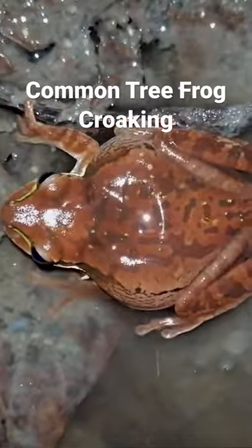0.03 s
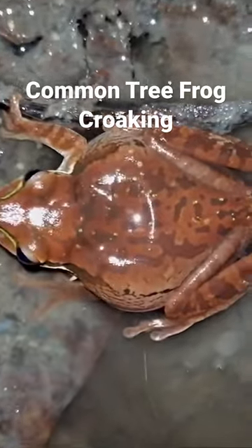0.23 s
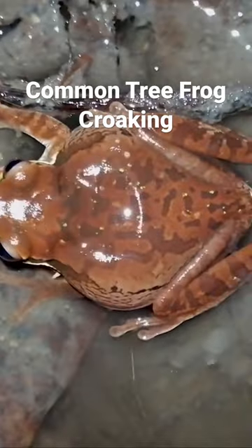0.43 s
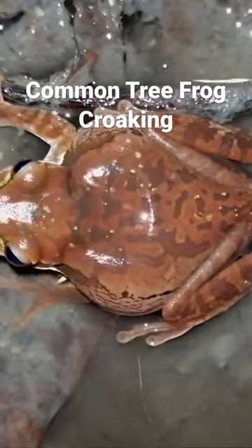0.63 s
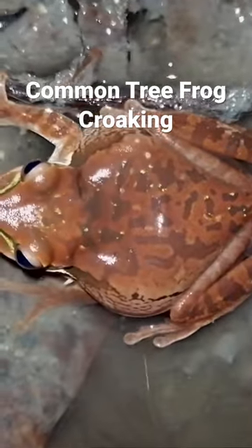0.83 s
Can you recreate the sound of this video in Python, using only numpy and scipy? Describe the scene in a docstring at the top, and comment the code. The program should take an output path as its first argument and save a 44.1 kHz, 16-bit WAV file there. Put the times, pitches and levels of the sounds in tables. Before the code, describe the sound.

A tree frog croaks four times close by, each croak a short rattle of quick pulses. A second frog answers more faintly from further off, between and once under the croaks, over quiet outdoor noise and a low hum.

```python
"""A distant rattle dies away, then a tree frog croaks close by, on wet ground beside shallow water.
Loose clicks speed up into a rattle of vocal-fold pulses, which darkens as the throat goes slack.
A second frog answers from further off and a soft low thud follows. The near frog croaks three more
times, the far one overlapping, answering and calling last. Throughout, hard surfaces ring briefly
over quiet outdoor noise with a low hum."""
import sys
import numpy as np
from scipy import signal
from scipy.fft import rfft, irfft
from scipy.io import wavfile
from scipy.ndimage import uniform_filter1d, minimum_filter1d

SR = 44100
rng = np.random.default_rng(int(sys.argv[2]) if len(sys.argv) > 2 else 0)


def transcribe(signal):
    """Save signal, clipped to [-1, 1], as a 16-bit WAV file at the path in sys.argv[1]."""
    frames = np.atleast_2d(signal).T
    limited = np.clip(frames, -1, 1)
    pcm = np.round(limited * 32767).astype(np.int16)
    wavfile.write(sys.argv[1], SR, pcm)


N = 119070

# Loose clicks that lead into a croak: start_s, level_db
LEAD_IN_CLICKS = [(0.1978, -37), (0.2108, -22), (0.2184, -18), (0.9014, -32), (0.9254, -21.5),
                  (0.9348, -17), (0.9422, -16.5), (0.966, -12.5), (0.9824, -8.5), (0.9906, -9),
                  (2.1818, -28)]
# One curve per croak: time_s, pulse_rate_hz, level_db
CROAK_CURVES = [
    [(0.2372, 88, -12.5), (0.2506, 58.8, -10.5), (0.2786, 87.5, -7), (0.2912, 75, -9.5), (0.3172, 158, -7),
     (0.3868, 162.0, -14), (0.3957, 54, -20.5)],
    [(1.0033, 52.5, -4.5), (1.041, 109.9, -8.5), (1.062, 170.8, -4.5), (1.0748, 152.6, -8.5),
     (1.1005, 157.1, -8.9), (1.1368, 173.4, -11.5), (1.1454, 60, -13.5)],
    [(1.419, 140, -23), (1.4476, 137.7, -13.5), (1.4775, 135.4, -10), (1.4983, 49, -6.5),
     (1.5212, 134.3, -9.5), (1.5532, 111.4, -9.5), (1.56, 142, -10.5), (1.5883, 136, -11),
     (1.6098, 53.9, -17)],
    [(2.2075, 83.4, -20), (2.2221, 49.5, -15.5), (2.2534, 80, -9.5), (2.2845, 52.1, -5.5),
     (2.3192, 61.8, -8), (2.3312, 113.7, -8), (2.3418, 63.6, -7), (2.3788, 152.9, -7.9),
     (2.4027, 97.5, -9.0), (2.4286, 58.2, -10.5)],
]
# Throat response, taut and slack: frequency_hz, gain_db
NEAR_TAUT_THROAT = [(60, -51.5), (230, -30.5), (320, -19), (420, -10.5), (520, 0.5), (700, -3),
                    (1000, -3.5), (1300, 4), (1550, -1), (1900, -12), (2300, -24.5), (2900, -14),
                    (3450, -17), (4200, -32), (5200, -42.5), (6500, -44), (8500, -50), (14000, -56),
                    (17000, -66)]
NEAR_SLACK_THROAT = [(60, -60), (220, -19.5), (330, -11), (480, 1), (620, 2), (850, -7), (1200, -12),
                     (1500, -15), (2000, -14), (2800, -19.5), (3800, -25), (5000, -44.5), (8000, -61.5),
                     (16000, -65)]

def near_frog(slack_s=0.059, jitter_s=.00012):
    """Pulse train: the vocal folds snap once per cycle of the integrated pulse rate."""
    out = np.zeros(N)
    throat = NEAR_TAUT_THROAT, NEAR_SLACK_THROAT, slack_s
    for start_s, level_db in LEAD_IN_CLICKS:
        add(out, start_s, throat_pulse(level_db, WHISTLE_GLIDE_S, *throat))
    for croak in CROAK_CURVES:
        time_s, rate_hz, level_db = np.transpose(croak)
        t = np.arange(time_s[0], time_s[-1] + PULSE_S, 1 / SR)
        cycles = np.floor(np.cumsum(np.interp(t, time_s, rate_hz)) / SR)
        for at in t[np.diff(cycles, prepend=-1) > 0]:
            start_s = at + jitter_s * rng.standard_normal()
            add(out, start_s, throat_pulse(np.interp(at, time_s, level_db), time_s[-1] - at, *throat))
    return out


FULL_DB, PULSE_S = -6, .003  # a full pulse's level; the span that sets its energy
DULLING_DB_PER_OCTAVE, DULL_ABOVE_HZ = 0.92, 1830  # for each dB under full
STRETCH, STRETCH_BEFORE_END_S, STRETCH_WIDTH_S = 0.091, 0.063, 0.017
CRACKLE_ABOVE_HZ, CRACKLE_BEFORE_END_S, CRACKLE_FADE_S, CRACKLE_LOSS_DB = 5400, 0.085, .04, 6.5
WHISTLE_GLIDE_S, WHISTLE_WIDTH_HZ = .17, 110
# Thin overtones that fall through a croak: start_hz, end_hz, final_boost_db
FALLING_WHISTLES = [(7600, 5400, 12.5), (11300, 8600, 19.5), (14500, 13400, 18)]

def throat_pulse(level_db, remaining_s, taut, slack, slack_s,
                 grain_db=2, shimmer_db=.5, sweep_s_per_hz=2e-7):
    """Source and filter: one vocal-fold snap rings the throat, which relaxes over the last slack_s."""
    hz = bins()
    relaxed = np.clip(1 - remaining_s / slack_s, 0, 1)
    # The resonances rise briefly near the end of the croak.
    stretch = 1 + STRETCH * np.exp(-((remaining_s - STRETCH_BEFORE_END_S) / STRETCH_WIDTH_S) ** 2)
    db = (1 - relaxed) * read(taut, hz / stretch) + relaxed * read(slack, hz)
    # Soft pulses lose treble.
    dulling_db = (1 - relaxed) * DULLING_DB_PER_OCTAVE * max(FULL_DB - level_db, 0)
    db -= dulling_db * np.clip(np.log2((hz + 1) / DULL_ABOVE_HZ), 0, 1)
    # Early pulses crackle; in later ones the whistles stand out.
    late = np.clip(1 - (remaining_s - CRACKLE_BEFORE_END_S) / CRACKLE_FADE_S, 0, 1)
    db -= late * CRACKLE_LOSS_DB * np.clip(2 * np.log2((hz + 1) / CRACKLE_ABOVE_HZ), 0, 1)
    for start_hz, end_hz, boost_db in FALLING_WHISTLES:
        whistle_hz = np.interp(remaining_s, [0, WHISTLE_GLIDE_S], [end_hz, start_hz])
        db += boost_db * (1 + late) / 2 / (1 + ((hz - whistle_hz) / WHISTLE_WIDTH_HZ) ** 2)
    # Colour and strength vary from pulse to pulse.
    grain = uniform_filter1d(uniform_filter1d(rng.standard_normal(len(hz)), size=16), size=16)
    strength = amp(level_db + shimmer_db * rng.standard_normal())
    snap = ring(db + grain_db * unit(grain), sweep_s_per_hz * hz / 2)  # treble comes slightly later
    return snap / np.linalg.norm(snap) * np.sqrt(PULSE_S * SR) * strength


# Throat response, taut and slack: frequency_hz, gain_db
FAR_TAUT_THROAT = [(60, -42), (280, -24), (370, -8.5), (550, -8), (750, -7.5), (1100, -3.5), (1400, 0.5),
                   (1680, 3), (2050, -19.5), (2700, -16.5), (3300, -23), (3900, -18.5), (5000, -43),
                   (6200, -39), (8000, -52.5), (14000, -51), (17000, -64)]
FAR_SLACK_THROAT = [(60, -26.5), (270, -23), (380, -1.5), (580, 4), (800, -6), (1300, -10), (2000, -16),
                    (2800, -17.5), (3900, -23), (5000, -42), (9000, -60), (16000, -66.5)]
# Answering croaks: start_s, length_s, pulse_rate_hz, level_db
FAR_CROAKS = [(-.2, 0.23, 140, -25), (0.543, 0.24, 123, -27), (1.349, 0.25, 130, -26),
              (1.837, 0.2, 124.5, -24.5), (2.61, .24, 126, -27.5)]

def far_frog(rise_s=0.058, start_db=-18, fall_s=0.058, end_db=-5, period_jitter=.017):
    """Amplitude modulation: a nearly periodic pulse train swells, holds and sags."""
    out = np.zeros(N)
    for start_s, length_s, rate_hz, level_db in FAR_CROAKS:
        times = np.cumsum(1 + period_jitter * rng.standard_normal(size=48)) / rate_hz
        for t in times[times < length_s]:
            remaining_s = length_s - t
            swell_db = start_db * max(1 - t / rise_s, 0) + end_db * max(1 - remaining_s / fall_s, 0)
            snap = throat_pulse(FULL_DB, remaining_s, FAR_TAUT_THROAT, FAR_SLACK_THROAT, slack_s=0.093)
            add(out, start_s + t, snap * amp(level_db + swell_db - FULL_DB))
    return out


# Right microphone port against the left, for the near frog: frequency_hz, gain_db
RIGHT_PORT_COLOUR = [(100, -7.5), (300, 0.5), (420, 4), (540, -1.5), (660, -20.5), (800, -3), (1000, -2),
                     (1200, -5.5), (1500, -2), (1800, -6.5), (2100, 3.5), (3000, 6), (4000, 0.5),
                     (7000, -2), (14000, -2.5)]

def direct_path(x, lag_s, coloured):
    """Path difference: sound reaches the right port later, optionally with its own colour."""
    right_db = read(RIGHT_PORT_COLOUR, bins()) if coloured else np.zeros_like(bins())
    right = signal.oaconvolve(x, ring(right_db, lag_s))[LEAD_SAMPLES:][:N]
    return np.array([x, right])


# Decay of the reflections: frequency_hz, t60_s
REFLECTION_DECAY = [(200, 0.01), (500, 0.2046), (1400, 0.2778), (3000, 0.2076), (8000, 0.04)]
# Colour of the reflections: frequency_hz, gain_db
REFLECTION_COLOUR = [(150, -4), (400, 1), (800, -2), (1500, -1.5), (2500, 2), (4000, 4), (9000, -2.5)]
# Low resonances of the surroundings: pitch_hz, t60_s, left_db, right_db
LOW_MODES = [(378, 0.15, -4.5, 2), (492, 0.15, -8, 2.5), (590.5, 0.18, 5.5, 1.5)]

def reflections(x, gap_s=0.002834):
    """Reverberation: dense echoes off hard surfaces and a few low modes decay exponentially."""
    t = np.arange(SR // 2) / SR
    echoes = rng.standard_normal((2, len(t))) * (t > gap_s)
    hz, frame_s, bands = signal.stft(echoes, SR, nperseg=256)
    fade = np.exp(-np.log(1000) * frame_s / read(REFLECTION_DECAY, hz)[:, None])
    tail = signal.istft(bands * fade, SR)[1][:, :len(t)]
    tail /= np.sqrt(np.mean(abs(rfft(tail)[:, 100:2000]) ** 2))  # unit gain over 200-4000 Hz
    tail = signal.oaconvolve(tail, ring(read(REFLECTION_COLOUR, bins()))[None])[:, :len(t)]
    for pitch_hz, t60_s, left_db, right_db in LOW_MODES:
        decay = np.log(1000) / t60_s
        mode = 2 * decay / SR * np.exp(-decay * t) * np.sin(2 * np.pi * pitch_hz * t)
        tail += amp([[left_db], [right_db]]) * mode
    return signal.oaconvolve(x[None], tail)[:, :N]


def thud(centre_s=0.763, pitch_hz=70, width_s=0.014, level_db=-46):
    """Tone burst: a low sine under a short Gaussian envelope is heard as a soft thud."""
    t = np.arange(N) / SR - centre_s
    return amp(level_db) * np.exp(-(t / width_s) ** 2) * np.sin(2 * np.pi * pitch_hz * t)


# Outdoor noise spectrum: frequency_hz, relative_density_db
AIR_SPECTRUM = [(20, -11), (50, -7.5), (160, -5), (250, -2), (400, 1.5), (600, -4.5), (1000, -2),
                (1600, -7), (2100, -7), (3200, -14.5), (5000, -28), (8300, -32.5), (10000, -47.5),
                (16000, -63)]
# Likeness of left and right: frequency_hz, correlation
AIR_CORRELATION = [(25, .1), (60, 0.6), (125, .85), (300, 0.78), (1000, 0.54), (8000, 0)]
# Low hums: pitch_hz, width_hz, level_db
HUM_BANDS = [(122.1, 11.1, -57.5), (321.4, 10.5, -57)]

def background(air_db=-47.5):
    """Filtered noise: a broad, partly correlated band is the air; narrow bands waver as a hum."""
    hz = np.fft.rfftfreq(N, 1 / SR)
    left, independent, hum_noise = rfft(rng.standard_normal((3, N)))
    correlation = read(AIR_CORRELATION, hz)
    right = correlation * left + np.sqrt(1 - correlation ** 2) * independent
    air = irfft(np.array([left, right]) * amp(read(AIR_SPECTRUM, hz)), N)
    hum = np.zeros(N)
    for pitch_hz, width_hz, level_db in HUM_BANDS:
        band = np.exp(-((hz - pitch_hz) / width_hz) ** 2)
        hum += amp(level_db) * unit(irfft(hum_noise * band, N))
    return amp(air_db) * unit(air) + hum


LEAD_SAMPLES = 24

def ring(db, delay_s=0):
    """Minimum phase: a spectrum's causal impulse response, delayed and tapered at both ends."""
    log_gain = np.log(amp(np.r_[db, db[-2:0:-1]]))
    response = np.exp(np.conj(signal.hilbert(log_gain)))[:len(db)]
    impulse = np.roll(irfft(response * np.exp(-2j * np.pi * bins() * delay_s)), LEAD_SAMPLES)
    n = np.arange(len(impulse))
    fade_in = np.sin(np.pi / 2 * np.minimum(n / LEAD_SAMPLES, 1)) ** 2
    return impulse * fade_in * np.cos(np.pi / 2 * n / len(impulse))


def amp(db):
    """Decibels to amplitude ratio."""
    return 10 ** (np.asarray(db) / 20)


def unit(x):
    """Normalisation to rms 1."""
    return x / np.sqrt(np.mean(x ** 2) + 1e-20)


def read(points, hz):
    """Interpolation on a log-frequency axis."""
    frequency_hz, value = np.transpose(points)
    return np.interp(np.log(hz + 1), np.log(frequency_hz), value)


def add(mix, start_s, sound):
    """Superposition of one sound, skipped if it starts before time zero."""
    if start_s >= 0:
        part = mix[round(start_s * SR):][:len(sound)]
        part += sound[:len(part)]


def bins(size=2048):
    """Frequencies of a short Fourier transform."""
    return np.fft.rfftfreq(size, 1 / SR)


def scene():
    """Direct-to-reverberant ratio: the near frog is mostly direct sound, the far one mostly echo."""
    near, far = amp(-0.84) * near_frog(), far_frog()
    direct = direct_path(near, lag_s=.00018, coloured=True)
    direct += amp(-5) * direct_path(far, lag_s=.00034, coloured=False)
    reflected = reflections(amp(-11.5) * near + amp(1.5) * far)
    return direct + reflected + thud() + background()


def record(dry, ceiling=.93, cutoff_hz=15500):
    """Peak limiting: a quick gain dip holds the loudest pulses; a low-pass then limits the band."""
    allowed_gain = np.minimum(ceiling / (abs(dry).max(0) + 1e-9), 1)
    held_gain = minimum_filter1d(allowed_gain, size=241)
    gain = uniform_filter1d(uniform_filter1d(held_gain, size=121), size=121)
    low_pass = signal.firwin(255, cutoff_hz, window=("kaiser", 8), fs=SR)
    return signal.oaconvolve(dry * gain, low_pass[None], "same")


dry = scene()
out = record(dry)
transcribe(out)
```